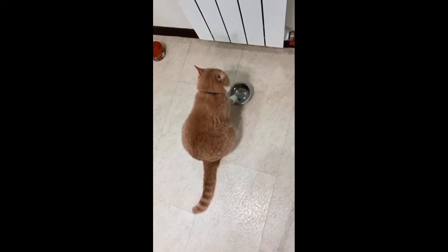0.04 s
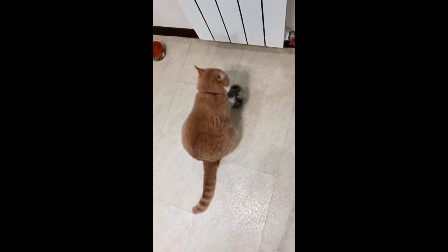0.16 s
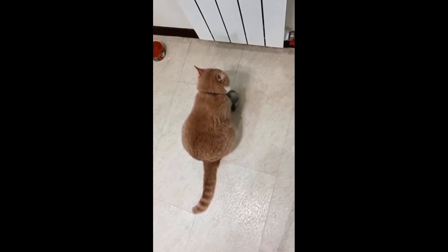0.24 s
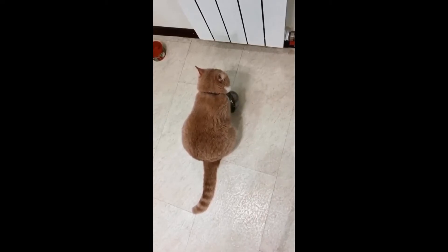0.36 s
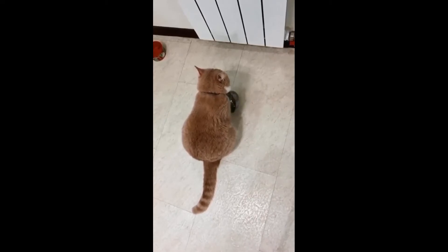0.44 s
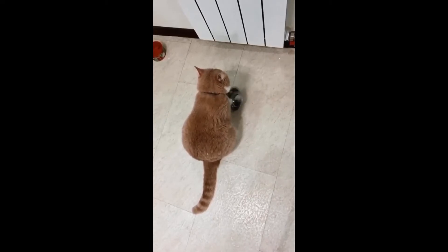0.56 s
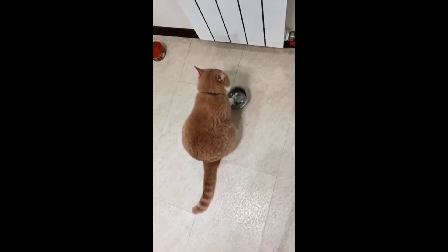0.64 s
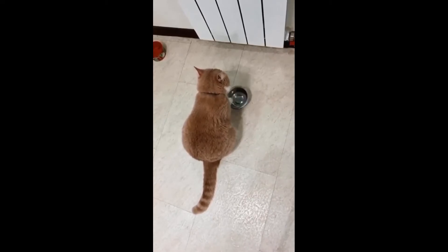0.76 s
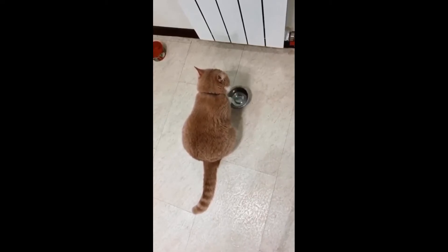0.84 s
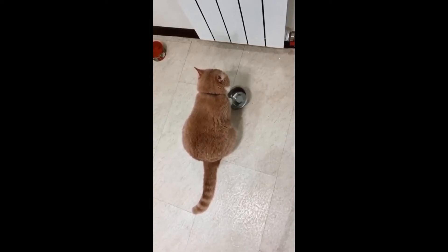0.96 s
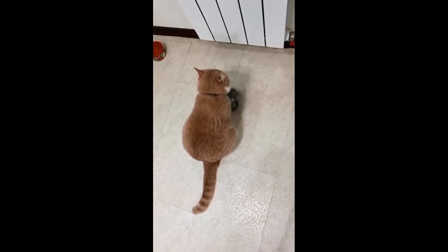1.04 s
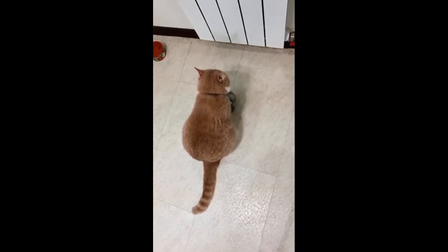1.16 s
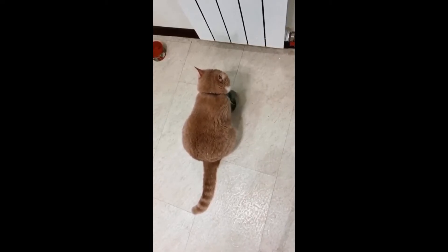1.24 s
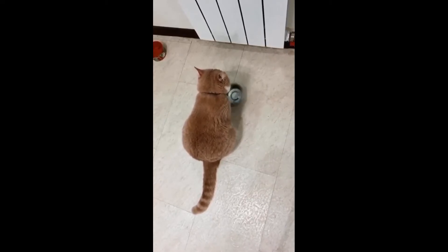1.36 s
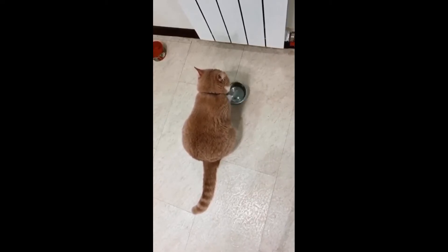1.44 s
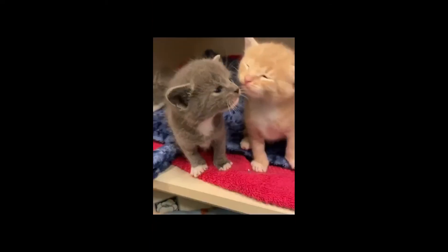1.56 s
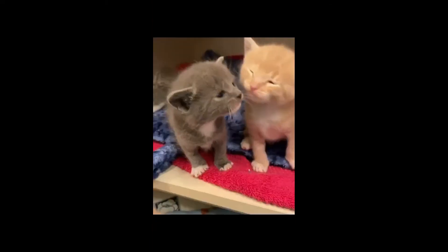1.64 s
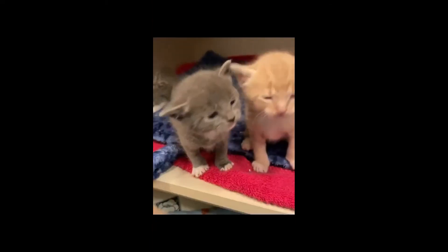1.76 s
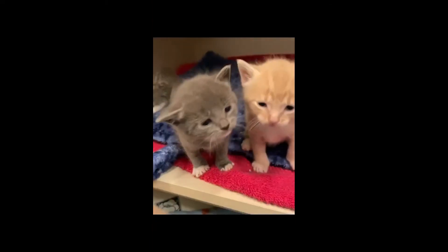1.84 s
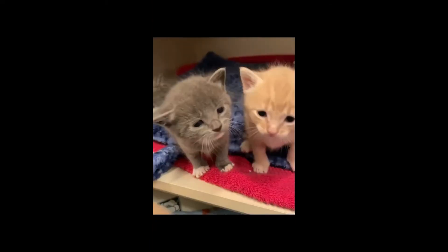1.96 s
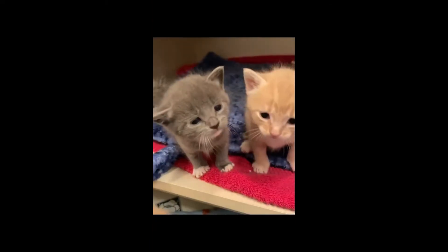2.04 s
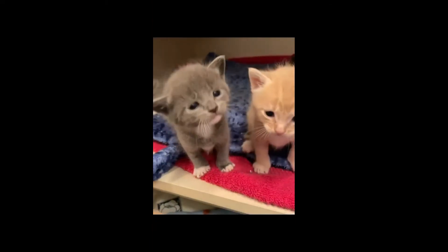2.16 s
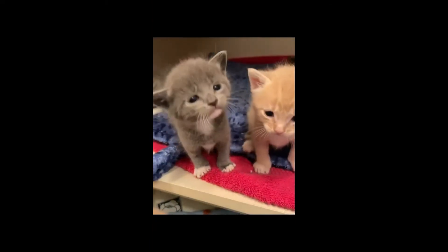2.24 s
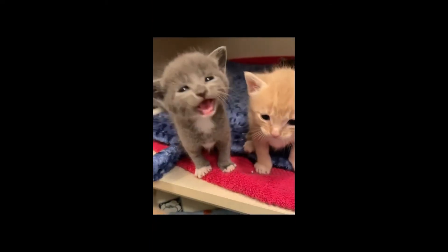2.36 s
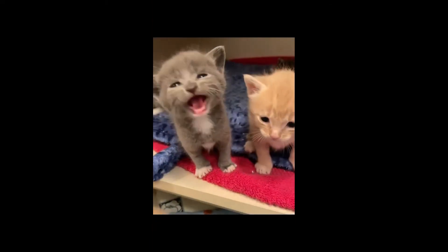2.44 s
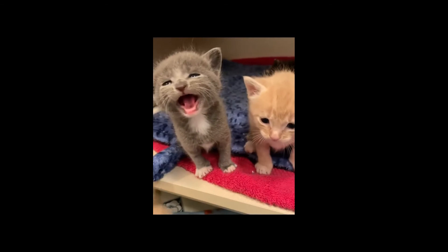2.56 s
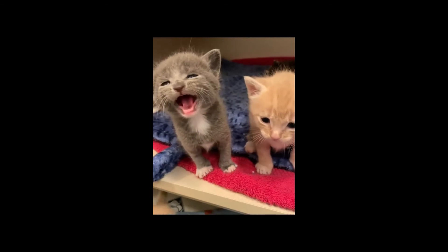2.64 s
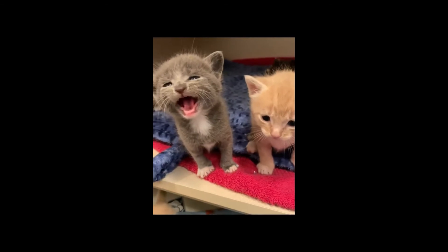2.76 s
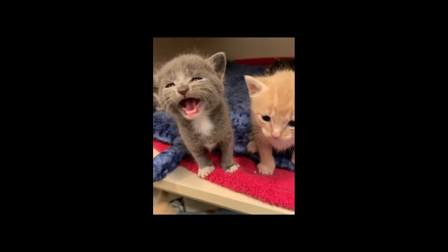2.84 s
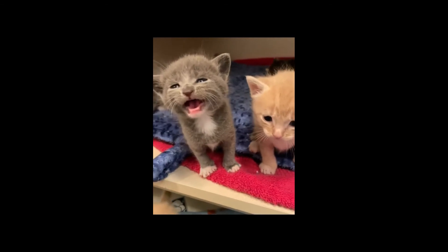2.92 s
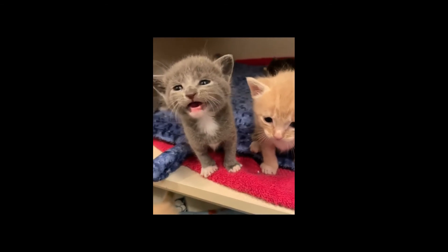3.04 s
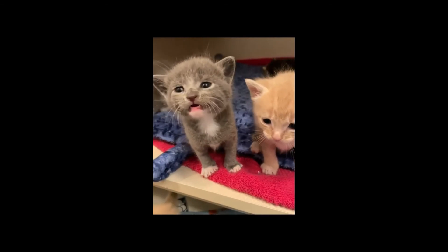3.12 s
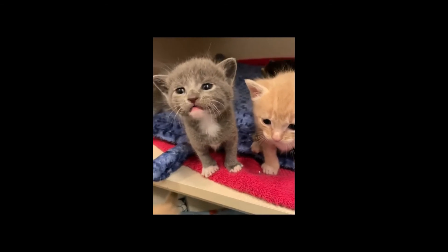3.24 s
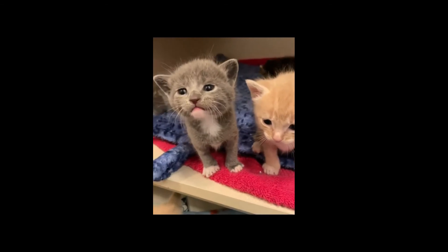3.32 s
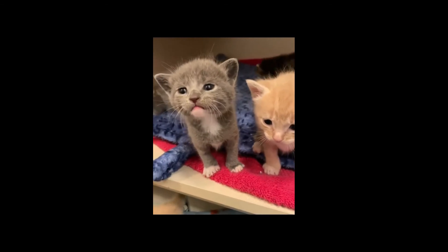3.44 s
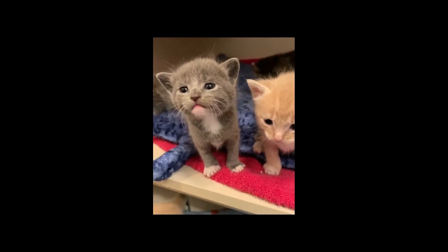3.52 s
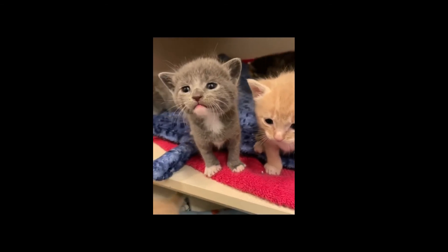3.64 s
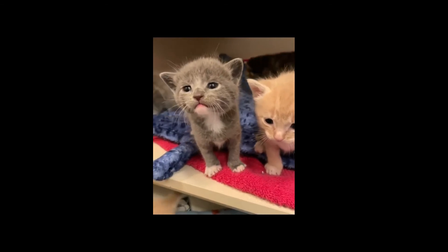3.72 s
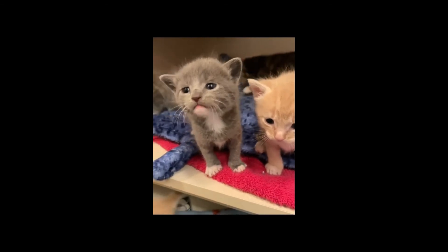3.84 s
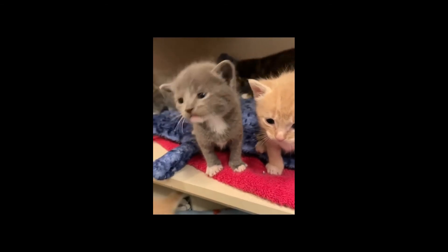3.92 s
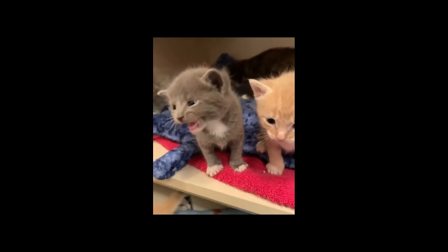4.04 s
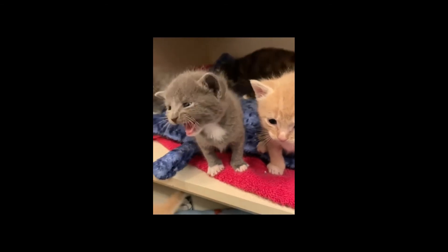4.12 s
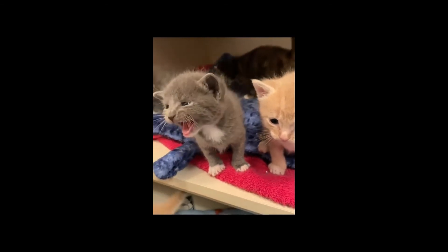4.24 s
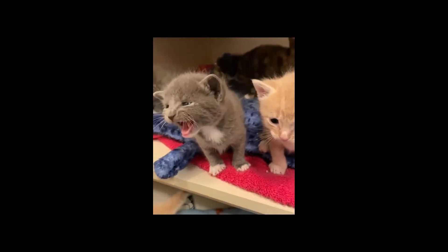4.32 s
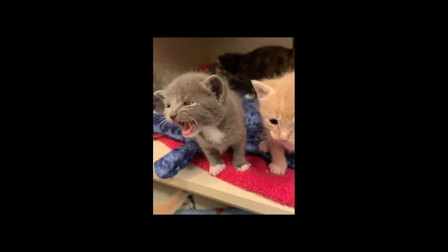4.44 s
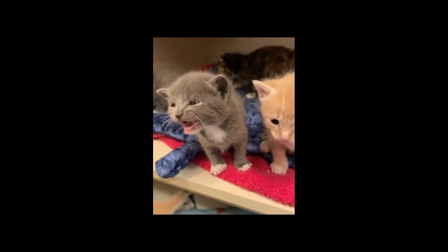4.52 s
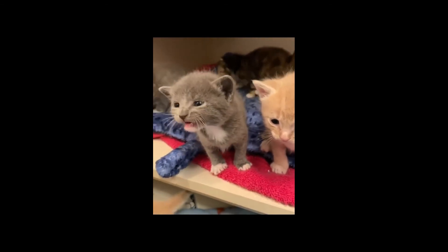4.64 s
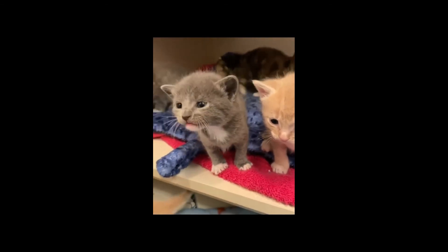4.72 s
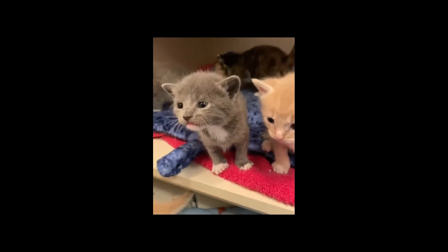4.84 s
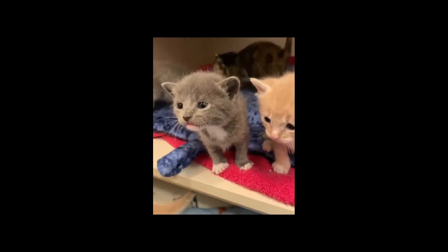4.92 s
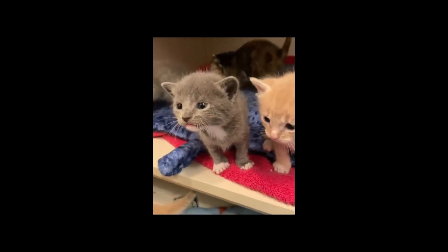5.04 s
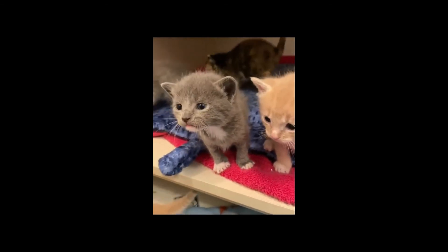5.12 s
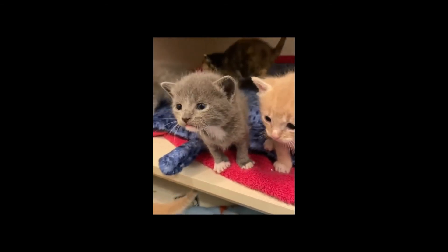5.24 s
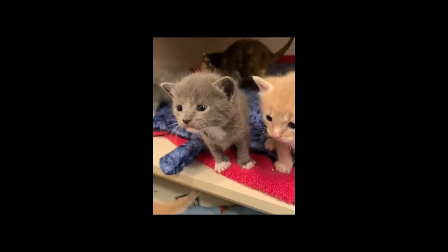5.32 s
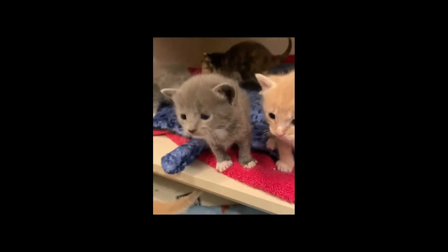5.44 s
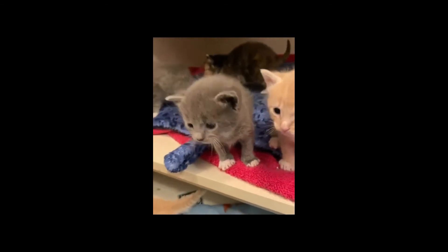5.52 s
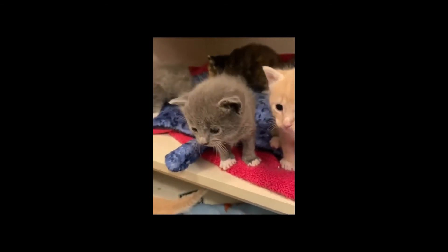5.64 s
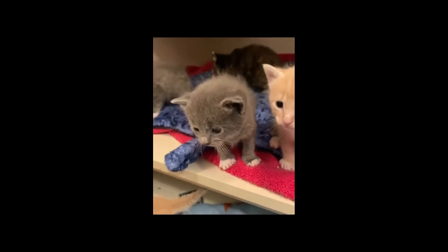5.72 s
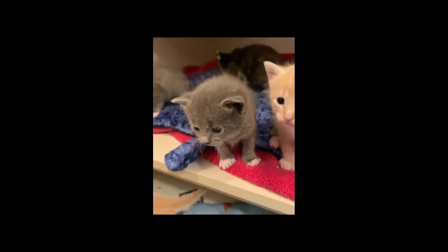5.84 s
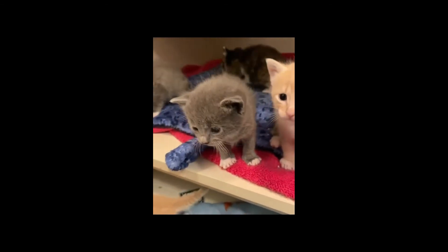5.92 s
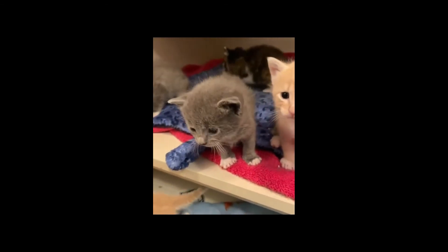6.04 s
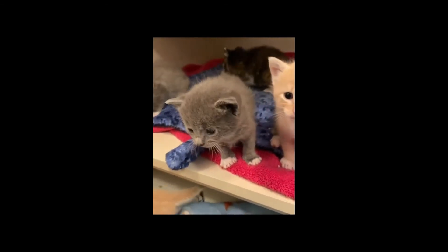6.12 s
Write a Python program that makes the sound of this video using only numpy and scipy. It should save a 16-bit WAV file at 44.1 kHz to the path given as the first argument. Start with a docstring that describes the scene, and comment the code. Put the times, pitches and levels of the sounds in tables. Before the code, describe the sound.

A steel bowl clanks and rings on a hard floor, rolls onto its rim, then abruptly a close kitten gives two long arched mews.

```python
"""Steel bowl and close kitten

A bare room with a hard floor: a cat paws a steel bowl, which tips, drops back and at last rolls ringing on its rim.
Coloured noise makes its clatter, decaying sines its ring. The scene cuts to a quiet room, a kitten close to a
two-port microphone: it ends one mew and gives two long arched ones, harmonic stacks with rasp noise. Around it are
a faint squeak, soft bumps and rustles, a low sine hum and dull noise for the air."""
import sys
import numpy as np
from scipy import signal
from scipy.fft import rfft, irfft, next_fast_len
from scipy.io import wavfile
from scipy.ndimage import uniform_filter1d, map_coordinates

SR = 44100
rng = np.random.default_rng(int(sys.argv[2]) if len(sys.argv) > 2 else 0)


def master(y):
    """Save y as 16-bit WAV."""
    cut = np.clip(np.atleast_2d(y).T, -1, 1)
    pcm = np.round(cut * 32767)  # scale
    wavfile.write(sys.argv[1], SR, pcm.astype(np.int16))


N = 272097
TIME = np.arange(N) / SR

# All levels are relative; each layer has its own trim where it is built.
# knocks on the base; the first row is the dying clatter of an earlier one:
# start_s, strength_db, hardness_db (clank above thud), free_ring_db
BASE_KNOCKS = [(0.0, -42.5, 3.5, -3.5), (.095, -15.5, 1.5, 2.5), (0.207, -18.5, -16, -8.5),
               (.538, -42.5, -8, -15), (0.563, -42.5, -10.5, 3.5), (0.665, -31, -4, -4.5),
               (0.679, -34.5, 1.5, -14), (0.726, -32, -0.5, -1.5), (0.739, -29.5, -2.5, -12),
               (.804, -41, -20, 3), (.957, -21, -3.5, 4.5), (.98, -25, -10.5, 6), (1.057, -16.5, -14, -2.5)]
# the bowl lands on its rim and bounces: start_s, clank_db
RIM_STRIKES = [(1.277, -20), (1.283, -21.5), (1.316, -23), (1.367, -23), (1.429, -31), (1.451, -24)]
# each bounce lands flatter; rows thud, sizzle, base ring, rim ring: first_db, fall_db_per_s
# (thud, sizzle and rim ring are relative to the clank)
SETTLING = [(4, 11.5), (0, 51), (-7, 75.5), (7, 135.5)]
# bowl modes: pitch_hz, base_struck_db, rim_struck_db, t60_s
BOWL_MODES = [(355, 1, -16, .42), (401, -7, -20, .4), (456, -7, -22, .35), (617, -20, -17, .5),
              (740, -17, -14, .5), (1024, -30, -8, .6), (1040, -5, -28, .48), (1238, -24, -14, .9),
              (1529, -16, -21, .6), (1663, -8, -17, .6), (1871, -12, -30, .5), (2027, -17, -28, .5),
              (2143, -16, -30, .5), (2497, -15, -8, .5), (2506, -30, -7, .5), (2528, -28, -3, .45),
              (2619, -21, -10, .55), (2716, -22, -7, .4), (3085, -17, -35, .55), (3495, -18, -35, .5),
              (3748, -20, -16, .55), (3809, -35, -14.5, .8), (4306, -9, -35, .38), (4336, -8, -35, .45),
              (4810, -18, -35, .35), (6408, -45, -11, .17), (6538, -45, -21, .6), (7166, -28, -17, .35),
              (8041, -45, -20, .5), (9129, -50, -24, .5)]
# rocking on the rim feeds the lowest rim mode: time_s, level_db
ROLL = [(1.28, -33), (1.308, -17), (1.352, -9.5), (1.388, -9.5), (1.418, -29), (1.44, -17.5),
        (1.475, -25.5)]
# colours of a contact, dull to bright, and the bright edge of a base knock: frequency_hz, level_db
THUD_COLOUR = [(30, -39), (60, -32), (88, -17.5), (115, -32.5), (160, -14.5), (225, -10), (280, -2),
               (355, 2.5), (470, -5), (650, -9.5), (950, -9.5), (1400, -19.5), (3000, -59)]
CLANK_COLOUR = [(300, -25), (800, -15), (1150, -9.5), (1370, -2), (1750, 2.5), (2600, 0), (2950, -4),
                (3700, -7), (4500, -8), (5400, -12), (6400, -24), (12000, -45)]
SIZZLE_COLOUR = [(1500, -33), (4000, -7.5), (5500, 1.5), (8200, 0), (9100, -7.5), (10200, -7),
                 (12300, -15.5), (14000, -5)]
BRIGHT_EDGE_COLOUR = [(3000, -25), (4600, 6.5), (6000, -9.5), (8000, -11.5), (10000, -3.5), (11600, -10.5),
                      (13200, -4.5), (14500, -7)]
# ring-down of bowl and room together: band_hz, t60_s
BAND_DECAY = [(100, 0.84), (350, 0.32), (1000, 0.4), (2000, 0.44), (4500, 0.45), (8000, 0.35),
              (14000, 0.57)]
# rumble of the bare room: frequency_hz, level_db
RUMBLE_COLOUR = [(25, -20), (53, -5.5), (68, -10), (87, 3), (115, -9.5), (400, -12), (1500, -22.5),
                 (8000, -50)]
# pitch of each mew, smoothed when sung: time_s, pitch_hz
MEW_PITCH = [
    [(1.625, 926.5), (1.671, 884.3), (1.715, 810.3)],
    [(2.35, 574), (2.368, 677), (2.382, 771), (2.414, 909), (2.45, 1040), (2.49, 1139), (2.526, 1214),
     (2.59, 1243), (2.69, 1249), (2.8, 1196), (2.916, 1089), (3.024, 965), (3.122, 839.6), (3.252, 687),
     (3.28, 655), (3.33, 512)],
    [(4.03, 691), (4.048, 709.7), (4.062, 817.5), (4.09, 974), (4.148, 1190), (4.22, 1291), (4.268, 1177),
     (4.412, 1103), (4.664, 864.4), (4.696, 902.2), (4.742, 822), (4.788, 737), (4.875, 559.7)],
]
# loudness of each mew: time_s, voice_db, overtones_db
MEW_EFFORT = [
    [(1.63, -53, -77.5), (1.662, -52, -86), (1.715, -54, -81)],
    [(2.35, -55, -67), (2.466, -47, -50), (2.532, -36, -53), (2.662, -30, -53), (2.692, -30.5, -54.5),
     (2.786, -34.5, -56.5), (2.848, -36.5, -54), (2.908, -40, -55.5), (2.934, -44.5, -60),
     (3.154, -53.5, -69.5), (3.32, -54.5, -71), (3.33, -62.5, -74)],
    [(4.03, -50.5, -62.5), (4.148, -47, -51.5), (4.218, -26.5, -56.5), (4.232, -26.5, -55),
     (4.26, -30.5, -53.5), (4.316, -29, -40), (4.426, -31.5, -47.5), (4.454, -35, -48.5),
     (4.556, -39, -48.5), (4.674, -49, -65.5), (4.856, -54.5, -78.5), (4.875, -65, -84.5)],
]
# the mouth in each mew: rasp_start_s, open_s, shut_s, width_0_to_1, third_harmonic_twang_db
MEW_MOUTH = [(1.615, 1.6, 1.65, .1, -0.5), (2.344, 2.582, 3.18, 0.76, -10),
             (4.003, 4.266, 4.755, 0.99, 3.5)]
# throat and mouth resonances above the lowest harmonics: frequency_hz, gain_db
THROAT = [(1700, 35), (2600, 5.5), (3300, -14), (4000, -2.5), (4800, 0), (5900, 4.5), (6800, -5.5),
          (7600, -8), (8500, -11.5), (9800, -23), (11000, 4), (12400, 15), (13300, -2)]
# colour of the three lowest harmonics, mouth shut and wide open: frequency_hz, gain_db
MOUTH_SHUT = [(550, -2.5), (700, -9.5), (900, 2), (1250, -0.5), (1500, -12), (1800, -9.5), (2200, -14.5),
              (2650, -17), (3000, -3.5), (3500, -51), (3900, -43)]
MOUTH_OPEN = [(900, 0), (1250, -3), (1800, 31.5), (2100, 14), (2400, 18), (2600, 17.5), (2950, 4),
              (3300, 7), (3600, 5), (3900, -12)]
# the voice cracks: centre_s, half_length_s, roughness_0_to_1
CRACKS = [(4.53, .07, .3), (4.645, .026, .65)]
# colour of the kitten's rasp: frequency_hz, level_db
RASP_COLOUR = [(400, -15), (1200, -5), (2000, -6), (2700, 2.5), (3600, -3), (5500, -12.5), (7800, -17),
               (9500, 7), (11500, -2), (13000, -2), (13800, -31)]
# one faint squeak: centre_s, half_length_s, pitch_hz, peak_db
SQUEAK = (2.035, .015, 1530, -63)
# soft bumps and rustles; the one at 4.032 s is the onset of the last mew:
# start_s, bump_db, rustle_db, rustle_rise_s
BUMPS_AND_RUSTLES = [(2.153, -46.5, -72, .015), (2.279, -50, -78, 0.029), (3.37, -58, -56.5, 0.077),
                     (3.529, -52, -72, 0.068), (3.655, -54.5, -67.5, .06), (4.032, -36, -57, .02),
                     (4.88, -64, -61, 0.034), (4.99, -54, -67, .04), (5.43, -64, -69, 0.033),
                     (5.617, -54.5, -65, .035), (5.97, -61, -65.5, .04)]
# their colours: frequency_hz, level_db
BUMP_COLOUR = [(30, 1), (110, 13.5), (350, -3.5), (800, -5), (2000, -40)]
RUSTLE_COLOUR = [(600, -21), (1500, 1), (2600, -8.5), (4000, -2.5), (6200, -8), (8500, -9), (13000, -14)]
# the low hum: time_s, level_db
HUM_LEVEL = [(1.65, -61.5), (1.69, -55.5), (2.36, -59.5), (5.47, -45), (6.15, -50.5)]
# quiet-room air: frequency_hz, level_db
AIR_COLOUR = [(20, -34.5), (40, -29.5), (55, -3.5), (85, -7.5), (100, -17), (120, -6), (150, -19),
              (205, -12.5), (300, -18.5), (450, -25.5), (1000, -28.5), (1500, -36), (2000, -49),
              (2500, -40), (3100, -54.5), (6000, -56), (9000, -63), (13000, -62.5)]

# a base knock's sizzle, rim ring and bright edge, relative to its clank ahead of the layer trims
KNOCK_SIZZLE_DB, KNOCK_RIM_DB, BRIGHT_EDGE_DB = -15.5, -18.5, -15
STRIKE_RISE_S, STEEL_UNEVEN_DB = .001, 3.5
ROLL_HZ = 1025
FIRST_RING_DB, FIRST_RING_T60_S = -28.5, .15   # the roll mode is still dying away at the start
CUT_OUT_S, CUT_IN_S = 1.477, 1.624
OPENING_S, CLOSING_S = 0.4, 0.36
# the voice starts hoarse, clears, and frays at the end: roughness 0-1, and how long the edges last
CLEAR_ROUGH, ONSET_ROUGH, END_ROUGH = .03, .95, .5
ONSET_S, FRAY_S = 0.061, 0.15
RASP_DB, RASP_FOLLOWS = -27.5, 0.38   # RASP_FOLLOWS: share of the overtones' dB
RASP_RISE_S, RASP_TAIL_S = 0.0045, 0.061
HUM_HZ, AIR_DB = 74.5, -57.5
STOPBAND_HZ = 14500


def from_db(db):
    """Decibels to amplitude."""
    return 10 ** (np.asarray(db) / 20)


def rms_one(x):
    """Scale to rms 1."""
    return x / np.sqrt(np.mean(x ** 2) + 1e-20)


def in_time(rows, t=TIME):
    """Draw every column of a timed table as a curve of straight lines."""
    s, *columns = np.transpose(rows)
    return [np.interp(t, s, c) for c in columns]


def at_hz(points, hz):
    """Read a colour table along a logarithmic frequency axis."""
    table_hz, values = np.transpose(points)
    return np.interp(np.log(hz + 1e-9), np.log(table_hz), values)


def gate(t, start, stop, edge):
    """Open between start and stop, with straight ramps inside both ends."""
    return np.clip((t - start) / edge, 0, 1) * np.clip((stop - t) / edge, 0, 1)


def swell(t, centre, half_length):
    """A bell-shaped rise and fall, 1 at the top."""
    return np.exp(-((t - centre) / half_length) ** 2)


def noise(colour, size):
    """Noise with the given spectrum, rms 1."""
    n = next_fast_len(size)
    spectrum = rfft(rng.standard_normal(n))
    colour_gain = from_db(at_hz(colour, np.fft.rfftfreq(n, 1 / SR)))
    return rms_one(irfft(spectrum * colour_gain, n)[:size])


def drift(rate, t):
    """Smooth random wander about 0, through `rate` random points per unit of t."""
    return map_coordinates(rng.standard_normal(8192), [t * rate], order=3, mode="wrap")


def contacts():
    """Thud, clank, sizzle, base ring and rim ring of every contact, in dB; hardness lifts the clank."""
    rows = []
    for _, thud, hardness, ring in BASE_KNOCKS:
        clank = thud + hardness
        rows.append((thud, clank, clank + KNOCK_SIZZLE_DB, ring, clank + KNOCK_RIM_DB))
    first_db, fall = np.transpose(SETTLING)
    for s, clank in RIM_STRIKES:
        thud, sizzle, base, rim = first_db - fall * (s - RIM_STRIKES[0][0])
        rows.append((clank + thud, clank, clank + sizzle, base, clank + rim))
    return np.transpose(rows)


def ring_down(levels_db, t60, t, attack=STRIKE_RISE_S):
    """Envelope of something struck at every contact: the energies add, and each dies away."""
    power = np.zeros(len(t))
    for contact, db in zip(BASE_KNOCKS + RIM_STRIKES, levels_db):
        power[max(0, int(contact[0] * SR))] += from_db(db) ** 2
    power = signal.lfilter([1], [1, -from_db(-60 / (t60 * SR)) ** 2], power)
    rise = np.exp(-1 / (attack * SR))
    return np.sqrt(signal.lfilter([1 - rise], [1, -rise], power) + 1e-20)


def clatter(colour, levels_db, t, crack_db, crack_t60, uneven_db, rattle_db=1.1):
    """Crowded, unequal resonances of steel, floor and room: a short crack, then a tail that dies by band."""
    hz = np.fft.rfftfreq(len(t), 1 / SR)
    strengths = rms_one(from_db(uneven_db * np.minimum(drift(1 / 28, hz), 1.8)))
    spectrum = rfft(noise(colour, len(t))) * strengths
    crack = ring_down(levels_db + crack_db, crack_t60, t, attack=0.0009)
    out = 0
    for k, (_, t60) in enumerate(BAND_DECAY):
        # neighbouring bands crossfade
        share = at_hz([(row[0], j == k) for j, row in enumerate(BAND_DECAY)], hz)
        band = irfft(spectrum * share, len(t))
        out = out + band * np.hypot(ring_down(levels_db, t60, t), crack)
    return out * from_db(rattle_db * drift(300, t))   # the bowl rattles


def bowl_modes(t, thud, clank, sizzle, base, rim, waver=0.32, body_top_hz=1150, hard_hz=5600,
               base_ring_db=-6.5, rim_ring_db=-4.0, bright_ring_db=-0.5):
    """Clear steel modes, each a decaying sine driven by blows on base and rim."""
    out = np.zeros(len(t))
    for hz, base_db, rim_db, t60 in BOWL_MODES:
        # the bowl's weight drives the low modes, the hard contact the high ones
        blow = thud if hz < body_top_hz else clank + bright_ring_db
        # only a sharp contact wakes the top rim modes
        edge = rim if hz < hard_hz else rim + sizzle - clank
        from_base = ring_down(blow + base + base_db + base_ring_db, t60, t)
        from_rim = ring_down(edge + rim_db + rim_ring_db, t60, t)
        # the rocking bowl turns its lobes past the microphone, so each mode wavers
        swing = 1 + waver * (drift(45, t) + 1j * drift(45, t))
        tone = np.real(swing * np.exp(2j * np.pi * (hz * t + rng.random())))
        out += np.sqrt(2) * np.hypot(from_base, from_rim) * tone
    return out


def rim_singing(t):
    """Rocking on the rim feeds its lowest mode; an earlier ring of it dies away at the start."""
    rolling = from_db(in_time(ROLL, t)[0]) * (t > RIM_STRIKES[0][0])
    first_ring = from_db(FIRST_RING_DB) * np.exp(-np.log(1000) * t / FIRST_RING_T60_S)
    tone = np.sin(2 * np.pi * ROLL_HZ * t + .12 * drift(43, t))
    return np.sqrt(2) * (rolling + first_ring) * tone


def bowl():
    """In the bare room, contacts set clatter and clear modes going; on its rim the bowl sings."""
    t = TIME[:72000]
    thud, clank, sizzle, base, rim = contacts()
    bright_edge = clank[:len(BASE_KNOCKS)] + BRIGHT_EDGE_DB   # base knocks only
    steel = STEEL_UNEVEN_DB
    out = clatter(THUD_COLOUR, thud - 5.0, t, crack_db=3.0, crack_t60=0.086, uneven_db=-2)
    out += clatter(CLANK_COLOUR, clank - 2.0, t, crack_db=0.0, crack_t60=0.014, uneven_db=steel)
    out += clatter(SIZZLE_COLOUR, sizzle - 1.0, t, crack_db=-5.0, crack_t60=0.026, uneven_db=steel)
    out += clatter(BRIGHT_EDGE_COLOUR, bright_edge, t, crack_db=-2.5, crack_t60=0.03, uneven_db=steel)
    out += bowl_modes(t, thud, clank, sizzle, base, rim)
    out += rim_singing(t)
    out += from_db(-50.5) * noise(RUMBLE_COLOUR, len(t))
    # a steep fade at the cut leaves a faint, brief remainder
    cut = gate(t, -1, CUT_OUT_S + 0.0024, 0.0033)
    remainder = from_db(-19.0) * gate(t, -1, 1.51, 0.041)
    return np.pad(out * np.maximum(cut, remainder), (0, N - len(t)))


def roughness(t, start, stop):
    """The folds beat unevenly as they start, as they stop, and where the voice cracks."""
    onset = ONSET_ROUGH * np.exp(-np.maximum(t - start, 0) / ONSET_S)
    fray = END_ROUGH * np.exp(-np.maximum(stop - t, 0) / FRAY_S)
    cracks = sum(depth * swell(t, s, half) for s, half, depth in CRACKS)
    return np.clip(CLEAR_ROUGH + onset + fray + cracks, 0, 1)


def throat_gains(hz, t, overtones, rough, overtone_db=1.5, treble_db=10.0, split_hz=9000, overtone_hz=3900):
    """Throat resonances colour the harmonics; effort sets how strongly the middle and top ones speak."""
    gains = from_db(at_hz(THROAT, hz)) * np.clip((13300 - hz) / 300, 0, 1)
    gains *= from_db((2 + 4 * rough) * np.array([drift(45, t) for _ in gains]))
    high = np.clip((hz - split_hz) / 1000 + .5, 0, 1)
    middle = (1 - high) * np.clip((hz - overtone_hz) / 1000 + .5, 0, 1)
    middle_size = np.sqrt(np.sum((gains * middle) ** 2, axis=0) + .03)
    high_size = np.sqrt(np.sum((gains * high) ** 2, axis=0) + .03)
    middle_gain = from_db(overtones + overtone_db) / middle_size
    high_gain = from_db(overtones + treble_db) / high_size
    return gains * ((1 - high) * middle_gain + high * high_gain)


def mouth_gains(hz, t, level, opening, twang_db, flutter_db=0.9):
    """The opening mouth shifts weight from the fundamental to the second harmonic."""
    lowest = from_db((1 - opening) * at_hz(MOUTH_SHUT, hz) + opening * at_hz(MOUTH_OPEN, hz))
    lowest[2] *= from_db(twang_db * opening)
    flutter = flutter_db * np.array([drift(40, t) for _ in lowest])
    return from_db(level + flutter) * lowest / np.linalg.norm(lowest, axis=0)


def breath_rasp(t, rough, overtones, rasp_s, stop, end_gain=0.72):
    """Hoarse noise grows with roughness and effort; it leads the voice and lingers after it."""
    rasp_db = RASP_DB + RASP_FOLLOWS * overtones + 1.5 * drift(100, t)
    rasp = rough * from_db(rasp_db) * noise(RASP_COLOUR, len(t))
    corners_s = [rasp_s, rasp_s + RASP_RISE_S, stop - FRAY_S, stop, stop + RASP_TAIL_S]
    return rasp * np.interp(t, corners_s, [0, 1, 1, end_gain, 0])


def mew(melody, effort, mouth, blur=0.42):
    """A stack of harmonics through a mouth that opens and shuts; a rough voice jitters and rasps."""
    start, stop = melody[0][0], melody[-1][0]
    rasp_s, open_s, shut_s, width, twang_db = mouth
    span = (TIME > rasp_s) & (TIME < stop + RASP_TAIL_S)
    t = TIME[span]
    pitch, = in_time(melody, t)
    level, overtones = in_time(effort, t)
    opening = np.minimum(1 + (t - open_s) / OPENING_S, (shut_s - t) / CLOSING_S)
    opening = width * np.clip(opening, 0, 1)
    rough = width * roughness(t, start, stop)   # a small, closed-mouth mew stays clean
    jitter = rough * (.016 * drift(450, t) + .028 * rough * drift(110, t)) + .0012 * drift(60, t)
    pitch = uniform_filter1d(pitch, size=1200, mode="nearest") * (1 + jitter)
    hz = np.arange(1, 21)[:, None] * pitch
    gains = throat_gains(hz, t, overtones, rough)
    gains[:3] = mouth_gains(hz[:3], t, level, opening, twang_db)
    # uneven closing of the folds smears the high harmonics most
    smear = blur * (1 + 4 * rough) * (hz / 12000) ** 2 * np.array([drift(500, t) for _ in hz])
    phase = 2 * np.pi * np.cumsum(hz, axis=1) / SR + smear
    voice = np.sqrt(2) * np.sum(gains * np.sin(phase), axis=0)
    shimmer = 1 + .5 * rough * drift(800, t)
    voice *= shimmer * gate(t, start - .008, stop + 0.015, 0.011)
    out = np.zeros(N)
    out[span] = voice + breath_rasp(t, rough, overtones, rasp_s, stop)
    return out


def squeak():
    """A faint sine swells and fades, its phase wandering."""
    s, half, hz, db = SQUEAK
    return from_db(db) * swell(TIME, s, half) * np.sin(2 * np.pi * hz * TIME + drift(80, TIME))


def bumps_and_rustles(bump_s=0.015, grain_db=2.5):
    """Each is a dull decaying bump of noise with a grainy rustle that rises and falls."""
    bump = noise(BUMP_COLOUR, N)
    rustle = noise(RUSTLE_COLOUR, N) * from_db(grain_db * drift(120, TIME) - 14.0)
    out = np.zeros(N)
    for s, bump_db, rustle_db, rustle_s in BUMPS_AND_RUSTLES:
        age = np.maximum(TIME - s, 0)
        out += from_db(bump_db) * np.minimum(age / 0.0018, 1) * np.exp(-age / bump_s) * bump
        out += from_db(rustle_db) * age / rustle_s * np.exp(1 - age / rustle_s) * rustle
    return out


def ports(x, lag_s=.000045):
    """Sound from one side reaches the two microphone ports a moment apart."""
    return np.array([x, map_coordinates(x, [np.arange(len(x)) - lag_s * SR], order=3)])


def nook(x, t60=.08, wet_db=-10.0):
    """Short, soft reflections from the shelf around the kitten: decaying noise, different at each port."""
    t = TIME[:12000]
    echoes = rng.standard_normal((2, len(t))) * from_db(-60 * t / t60) * (t > .001)
    echoes /= np.sqrt(np.sum(echoes ** 2, axis=1, keepdims=True))
    return from_db(wet_db) * signal.fftconvolve(x[None], echoes, axes=1)[:, :N]


def kitten():
    """Close mews, a squeak, bumps and rustles reach the ports directly and by reflection."""
    mews = sum(mew(*call) for call in zip(MEW_PITCH, MEW_EFFORT, MEW_MOUTH))
    close = mews + squeak() + bumps_and_rustles()
    return ports(close) + nook(close)


def low_hum(waver_db=1.1):
    """A low sine whose level and phase waver."""
    level_db, = in_time(HUM_LEVEL)
    level = from_db(level_db - 2.5 + waver_db * drift(9, TIME))
    return np.sqrt(2) * level * np.sin(2 * np.pi * HUM_HZ * TIME + 0.2 * drift(10.0, TIME))


def room_air(apart_hz=600):
    """Dull moving air, alike at both microphone ports only in the bass."""
    highpass = signal.butter(1, apart_hz, "high", fs=SR, output="sos")
    side = signal.sosfilt(highpass, noise(AIR_COLOUR, N))
    air = noise(AIR_COLOUR, N) + 1.7 * side * np.array([[1], [-1]])
    return from_db(AIR_DB) * air


def scene():
    """The bowl in its bare room, then a cut to the kitten in the quiet room."""
    cut_in = np.clip((TIME - CUT_IN_S) / 0.0019, 0, 1)
    return bowl() + (kitten() + low_hum() + room_air()) * cut_in


def record(dry):
    """Peaks beyond full scale are clipped, then a steep low-pass cuts the top."""
    lowpass = signal.cheby2(16, 70, STOPBAND_HZ, fs=SR, output="sos")
    return signal.sosfilt(lowpass, np.clip(dry, -1, 1))


dry = scene()
out = record(dry)
master(out)
```